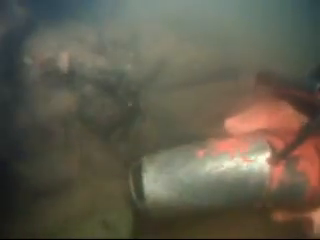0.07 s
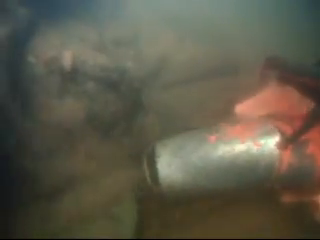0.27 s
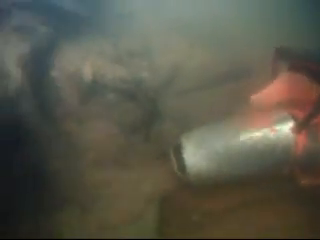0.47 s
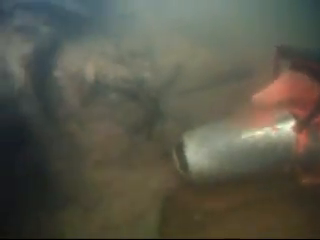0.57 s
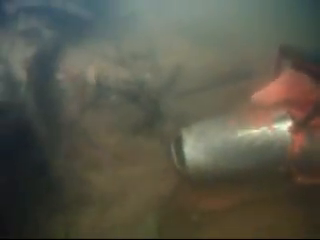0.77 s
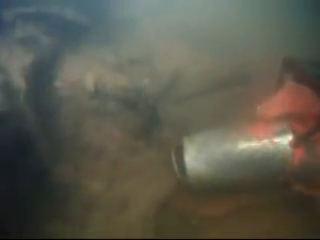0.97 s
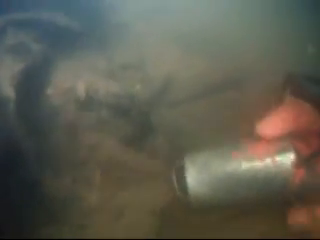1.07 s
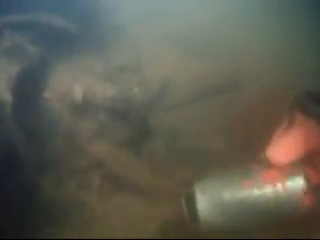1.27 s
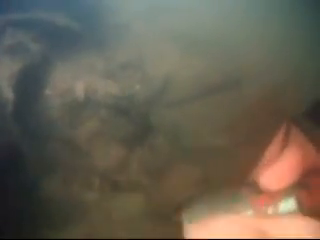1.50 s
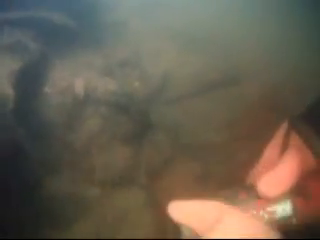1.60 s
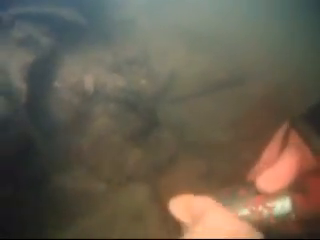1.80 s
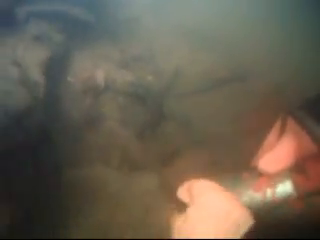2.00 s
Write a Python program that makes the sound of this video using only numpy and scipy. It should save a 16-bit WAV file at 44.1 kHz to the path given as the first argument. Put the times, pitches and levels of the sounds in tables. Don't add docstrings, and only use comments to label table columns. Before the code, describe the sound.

Hollow knocks of stones and a handle on a sealed camera case under water, with gritty rattles and pebble pings over low surging water; blows grow hardest around 1.3 to 1.7 seconds, clipping the muffled microphone.

```python
import sys
import numpy as np
from scipy import signal
from scipy.io import wavfile
from scipy.ndimage import uniform_filter1d

SR = 44100
rng = np.random.default_rng(int(sys.argv[2]) if len(sys.argv) > 2 else 0)


def makeup_ratio(level_db):
    decades = np.asarray(level_db, float) / 20
    return 10 ** decades


def to_wav(sig):
    pcm = np.clip(np.atleast_2d(sig), -1, 1) * 32767
    pcm = np.round(pcm).astype(np.int16)
    wavfile.write(sys.argv[1], SR, pcm.T)


N = 90404

# frequency_hz, density_db (per Hz)
GRAIN_SPECTRUM = [(300, -10.5), (600, 6), (1000, 5.5), (1600, 9), (2200, 9.5), (3000, 2.5), (3730, -1),
                  (3880, -24)]


def evened(x):
    return x / np.sqrt(np.mean(x ** 2) + 1e-20)


def colour(x, points):
    f, db = np.transpose(points)
    bins_hz = np.abs(np.fft.fftfreq(8192, 1 / SR))
    log_gain = np.log(makeup_ratio(np.interp(np.log(bins_hz + 1), np.log(f), db)))
    taps = np.fft.ifft(np.exp(signal.hilbert(log_gain).conj())).real[:4096]
    return signal.oaconvolve(x, taps)[:N]


def pair(hz, width):
    radius = np.exp(-np.pi * abs(width) / SR)
    return [1, -2 * radius * np.cos(2 * np.pi * hz / SR), radius * radius]


def case(x):
    # peak_hz, peak_width_hz, dip_hz, dip_width_hz
    wall_modes = [(526, 21, 568, 68), (928, 120, 872, 590), (1500, 136, 1378, 350), (2430, 127, 2302, 100),
                  (2830, 334, 2760, 487), (3384, 325, 3317, 650)]
    for peak_hz, peak_width, dip_hz, dip_width in wall_modes:
        x = signal.lfilter(pair(dip_hz, dip_width), pair(peak_hz, peak_width), x)
    return x


def drift(low_hz, top_hz):
    t = np.arange(N) / SR
    rates_hz = np.geomspace(low_hz, top_hz, 24)
    return evened(sum(np.sin(2 * np.pi * (f * t + rng.random())) / np.sqrt(f) for f in rates_hz))


def clicks(per_s, spread_db):
    size = makeup_ratio(spread_db * np.minimum(rng.exponential(1, N), 4)) * rng.choice([-1., 1.], N)
    return evened(size * (rng.random(N) < per_s / SR))


def surge_db():
    # time_s, level_db
    surge_points = [(0, -41.5), (.07, -51.5), (.12, -29.5), (.23, -31.5), (.27, -33.5), (.45, -25.5),
                    (.62, -25), (.8, -29), (.84, -35.5), (.9, -35), (1.02, -33.5), (1.12, -31.5),
                    (1.2, -25), (1.35, -25), (1.55, -25), (1.75, -35), (1.79, -43), (2.0, -48.5)]
    s, db = np.transpose(surge_points)
    return np.interp(np.arange(N) / SR, s, db)


def ticks():
    # time_s, splash_db, treble_db
    overloads = [(0, -48.5, -52.5), (.188, -60, -74), (.347, -61, -69), (0.8723, -72.5, -74.5),
                 (.931, -56.5, -71.5), (1.282, -67, -65.5), (1.321, -49.5, -67.5), (1.457, -58.5, -60),
                 (1.521, -63.5, -70.5), (1.7008, -49.5, -37.5), (1.746, -64, -73), (1.961, -58.5, -78)]
    t, noise = np.arange(N) / SR, rng.standard_normal(N)
    splash = sum(makeup_ratio(db) * np.exp(-((t - s) / 0.0052) ** 2) for s, db, _ in overloads)
    tick = sum(makeup_ratio(db) * np.exp(-((t - s) / 0.0014) ** 2) for s, _, db in overloads)
    hiss = makeup_ratio(-82 + 0.39 * (surge_db() + 34))
    # (Hz, dB per Hz)
    hiss_spectrum = [(3500, -4.5), (6300, -1.5), (8800, -5), (9100, -18.5), (16000, -21.5)]
    splash_spectrum = [(3500, 9.5), (4400, 11), (5200, -5), (7000, -20)]
    tick_spectrum = [(5000, -16.5), (5900, -13), (6300, 7.5), (8600, 0), (9200, -12), (10500, -2), (16000, -7)]
    return (colour(hiss * noise, hiss_spectrum)
            + colour(splash * noise, splash_spectrum)
            + colour(tick * noise, tick_spectrum))


def fizz():
    grains = clicks(per_s=2100, spread_db=5) + 1.1 * rng.standard_normal(N)
    flicker = makeup_ratio(3.14 * drift(12, 110))
    heard = evened(case(colour(grains * flicker, GRAIN_SPECTRUM)))
    return heard * makeup_ratio(-35.5 + 0.21 * (surge_db() + 31.5))


def water():
    # frequency_hz, density_db (per Hz)
    wash_spectrum = [(12, -42), (20, 0.5), (70, 0.5), (125, -3.5), (280, -9), (555, -15), (648, -17),
                     (1200, -23), (1560, -52.5), (2640, -120)]
    thuds = clicks(per_s=500, spread_db=3.5)
    wash = colour(0.5 * thuds + 0.5 * rng.standard_normal(N), wash_spectrum)
    wash = evened(wash * makeup_ratio(2.6 * drift(2.99, 30)))
    low = signal.sosfilt(signal.butter(2, 130, fs=SR, output="sos"), wash)
    level = surge_db() + 33.0
    return low * makeup_ratio(-26.0 + 0.54 * level) + (wash - low) * makeup_ratio(-23.5 + 0.86 * level)


def heaves():
    # start_s, level_db, pitch_hz
    slugs = [(0.091, -18, 129), (0.118, -21, 50), (.147, -13.5, 215), (.209, -8, 215), (0.214, -14, 75.6),
             (.225, -18.5, 140), (.344, -5, 174), (.36, -11, 180), (0.414, -7.5, 204), (.44, -18, 59),
             (0.561, -12.5, 89), (0.596, -9.5, 68.6), (.607, -14, 205), (0.684, -20, 112),
             (0.762, -12, 144), (.869, -11, 171), (.8695, -8, 85), (0.901, -12.5, 130), (.943, -13, 150),
             (.973, -7, 125), (1.075, -11, 77.2), (1.135, -9, 127.7), (1.17, -14.5, 50), (1.192, -17, 213),
             (1.232, -19, 256), (1.268, -11.5, 48), (1.405, -15.5, 100), (1.53, -13.5, 130),
             (1.6, -10.5, 130), (1.675, -18.5, 170), (1.742, -16.5, 200), (2.037, -18.5, 130)]
    cycles, glide = 1.92, -0.038
    out = np.zeros(N + SR)
    for s, db, hz in slugs:
        turns = np.arange(0, 3 * cycles, hz / SR)
        u = turns / cycles
        swell = u * np.exp(-1.6 * u ** 2)
        out[round(s * SR):][:len(u)] += makeup_ratio(db + 3) * swell * np.sin(2 * np.pi * turns * (1 + glide * u))
    return out[:N]


def grit():
    # start_s, level_db, length_s, colour_hz
    bursts = [(0.0096, -20.5, 0.0089, 2660), (0.077, -41, 0.0044, 1114), (0.1153, -31, 0.0034, 1600),
              (0.133, -22, 0.0088, 1820), (0.146, -17, 0.0088, 2430), (0.184, -15.5, 0.0093, 2470),
              (0.196, -11, 0.0056, 2730), (0.2088, -15, 0.015, 2475), (0.232, -25, 0.0072, 2570),
              (0.293, -26.5, 0.0052, 2750), (0.341, -17, 0.0088, 2320), (0.42, -21, 0.014, 2600),
              (0.462, -21.5, 0.0064, 3400), (0.4705, -19, 0.0033, 1500), (0.585, -24, 0.0097, 1500),
              (0.628, -33, 0.012, 2640), (.65, -24.5, 0.017, 1500), (0.659, -23, 0.014, 3230),
              (0.713, -29, 0.018, 2700), (0.726, -16.5, 0.0024, 3460), (0.7734, -23, 0.0037, 2780),
              (0.798, -22, 0.003, 3300), (0.888, -20, 0.0055, 3220), (0.9295, -12.5, 0.0067, 2700),
              (0.966, -19, 0.0087, 3370), (1.144, -15.5, 0.0065, 2960), (1.156, -13, 0.0057, 1300),
              (1.208, -21.5, 0.0078, 1700), (1.254, -21, 0.013, 1500)]
    # start_s, level_db, length_s, colour_hz
    late_bursts = [(.001, -21, 0.0057, 3870), (1.281, -19.5, 0.0056, 1500), (1.304, -22.5, 0.0065, 3300),
                   (.515, -26, .012, 1500), (1.322, -19.5, 0.009, 2700), (1.458, -12.5, 0.0064, 1500),
                   (1.4765, -7.5, 0.0037, 2600), (1.5193, -12.5, 0.0059, 3050), (1.527, -22, 0.006, 2790),
                   (1.538, -21.5, 0.027, 2330), (1.561, -21, 0.028, 3030), (1.632, -20, 0.0072, 2800),
                   (1.688, -23, 0.0095, 2900), (1.497, -27, .015, 2500), (.7665, -22, .004, 900),
                   (1.6995, -7.5, 0.005, 1900), (1.7425, -14.5, 0.0058, 3440), (1.7615, -25, 0.0063, 2470),
                   (1.768, -14, 0.0046, 3500), (1.786, -27, 0.013, 2630), (1.85, -19.5, 0.0069, 2150),
                   (1.884, -28, 0.019, 2730), (1.958, -25.5, 0.0078, 2600), (1.416, -25.5, .015, 2960),
                   (0.937, -10, 0.0026, 1500)]
    out, t = np.zeros(N + SR), np.arange(3000) / SR
    for s, db, length, hz in bursts + late_bursts:
        crackle = makeup_ratio(13.3 * uniform_filter1d(rng.standard_normal(3000), 40))
        grains = rng.standard_normal(3000) * crackle
        burst = grains * np.minimum(t / 0.00011, 1) * np.exp(-(t / length) ** 0.81)
        band = signal.butter(2, [hz / 1.208, hz * 1.086], "band", fs=SR, output="sos")
        out[round(s * SR):][:3000] += makeup_ratio(db) * (signal.sosfilt(band, burst) + makeup_ratio(-6) * burst)
    return makeup_ratio(-2.5) * case(colour(out[:N], GRAIN_SPECTRUM))


def pings():
    # start_s, level_db, pitch_hz, t60_s
    pebbles = [(0.1154, -22, 1550, .035), (0.1318, -30.5, 3280, 0.039), (0.1343, -29, 1500, .05),
               (0.151, -30, 2523, 0.082), (0.1871, -16.5, 2520, 0.035), (0.186, -19.5, 1530, .05),
               (0.195, -20.5, 2450, .04), (0.2091, -13.5, 2495, 0.064), (0.2098, -19.5, 1560, 0.061),
               (.195, -29.5, 3606, 0.22), (.233, -22.5, 2520, 0.032), (0.344, -21, 2560, 0.029),
               (0.3423, -19, 1496, 0.033), (0.4701, -18, 1500, 0.041), (.8, -23.5, 1526, 0.045),
               (.8, -27.5, 3470, 0.043), (0.8873, -26.5, 1173, 0.063), (.936, -23.5, 2427, 0.054),
               (1.2835, -30.5, 1500, .03), (1.3212, -8, 1500, 0.041), (1.4598, -11, 1520, 0.019),
               (1.478, -14.5, 1510, 0.056), (1.5215, -12.5, 3130, 0.031), (1.5302, -19.5, 2740, 0.029),
               (1.552, -19, 920, 0.073), (1.637, -23.5, 1500, 0.058), (1.7445, -21, 3390, 0.012),
               (1.7622, -16.5, 2520, 0.019), (1.7665, -17, 1502, 0.066), (1.826, -27, 2870, .025),
               (1.882, -38, 2500, 0.033), (1.9615, -24, 1522, 0.055)]
    rise_s, doublet_ratio = 0.0009, 1.02
    out, t = np.zeros(N + SR), np.arange(6000) / SR
    for s, db, hz, t60 in pebbles:
        ring = np.sin(2 * np.pi * hz * t) + 0.13 * np.sin(2 * np.pi * hz * doublet_ratio * t)
        decay = makeup_ratio(db - 60 * t / max(t60, .005))
        out[round(s * SR):][:6000] += decay * np.minimum(t / rise_s, 1) * ring
    return out[:N]


def cracks():
    # time_s, level_db
    snaps = [
        (1.3192, -3),
        (1.7004, -4),
        (1.7056, -6),
    ]
    t, width_s = np.arange(N) / SR, .00012
    out = np.zeros(N)
    for s, db in snaps:
        u = (t - s) / width_s
        out += makeup_ratio(db) * (2 * u ** 2 - 1) * np.exp(-u ** 2)
    return out


def knocks():
    # start_s, level_db, upper_modes_db (per octave), ring_length (factor)
    blows = [(.117, -20.5, 5.5, 1.3), (0.209, -12.5, 10, 1.67), (.26, -24, -3, 0.72), (0.342, -6, 8.5, 1.6),
             (0.421, -12, 1, 1.2), (0.4447, -9, -1, 0.42), (.609, -6, -6, 0.3), (.655, -13.5, 9, 0.66),
             (0.767, -16, 7, 0.33), (.79, -13, 4, 0.31), (.905, -17.5, 11.5, 0.53), (1.196, -19, 9.5, 1.4),
             (1.2798, -1.5, -7, 0.71), (1.311, -14, -2, .4), (1.3181, 0, 6, 0.96), (1.324, -2.5, -3, 0.55),
             (1.332, -7.5, -5, 0.27), (1.342, -10.5, -9, 1.5), (1.384, -9.5, 3.5, 1.37),
             (1.4573, 1, 0, 0.84), (1.471, -7, 6, 0.43), (1.487, -16.5, 12, 0.31), (1.499, -11, -16, 3.1),
             (1.538, -11.5, -14, 1.05), (1.554, -30, 27, 0.92), (1.635, -12, -15, 0.88),
             (1.699, 7, -18, 0.98), (1.7044, -4.5, -5, 0.46), (1.838, -20, -17, 0.9)]
    # pitch_hz, level_db, t60_s
    low_modes = [(293, -4, 0.051), (411.3, 0, 0.027), (545, 0.5, 0.077), (924, -21.5, 0.11),
                 (701.6, -12, 0.057)]
    lag_s, push_s = 0.00084, 0.0023
    out, t = np.zeros(N + SR), np.arange(8000) / SR
    push = makeup_ratio(-1) * np.sin(2 * np.pi * t / push_s) * (t < push_s)
    for s, db, upper_db, ring in blows:
        ring = max(ring, .1)
        modes = np.zeros(8000)
        for (hz, mode_db, t60), tune in zip(low_modes, rng.uniform(.985, 1.015, 5)):
            decay = makeup_ratio(mode_db + upper_db * np.log2(hz / 400) - 60 * t / (t60 * ring))
            modes += decay * np.sin(2 * np.pi * hz * tune * t)
        out[round(s * SR):][:8000] += makeup_ratio(db - 9.0) * (modes * np.minimum(t / lag_s, 1) + push / ring / 2)
    return signal.sosfilt(signal.butter(2, 120, "high", fs=SR, output="sos"), out[:N])


def scene():
    return (fizz() + 0.58 * water() + heaves() + grit() + pings() + cracks() + knocks())[None]


def low_pass(x):
    return signal.sosfilt(signal.butter(12, 16085, fs=SR, output="sos"), x)


def record(dry):
    hot = np.clip(dry, -0.84, 0.8)
    taps = signal.firwin(401, 4050, window=("kaiser", 6.), fs=SR)
    narrow = signal.oaconvolve(hot, taps[None], "same")
    return low_pass(narrow + ticks())


dry = scene()
out = record(dry)
to_wav(out)
```